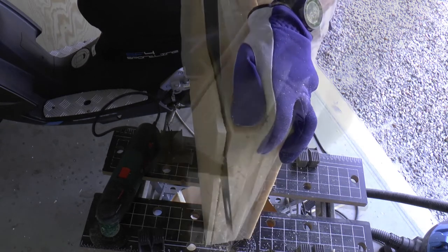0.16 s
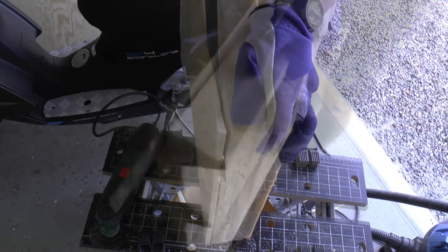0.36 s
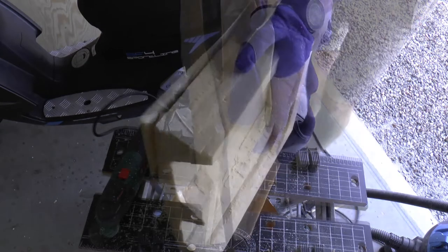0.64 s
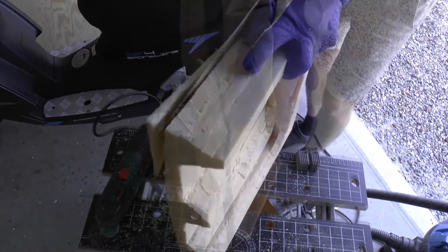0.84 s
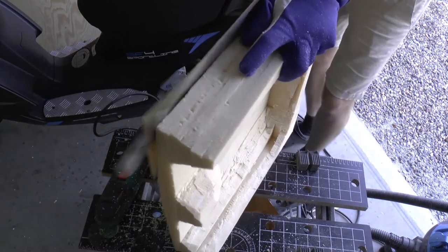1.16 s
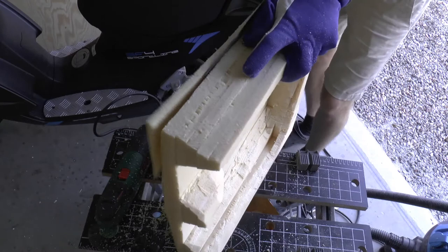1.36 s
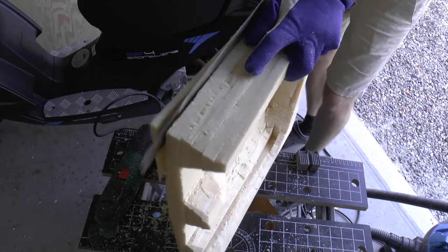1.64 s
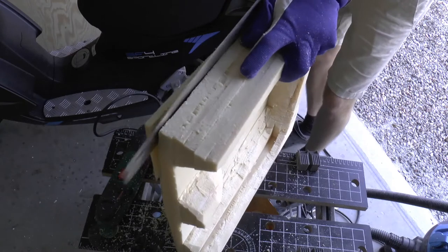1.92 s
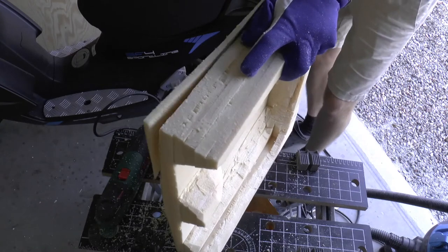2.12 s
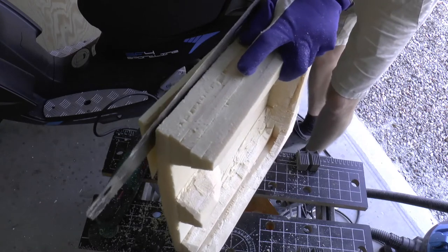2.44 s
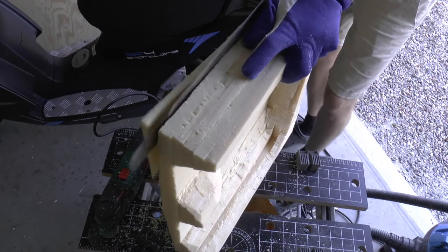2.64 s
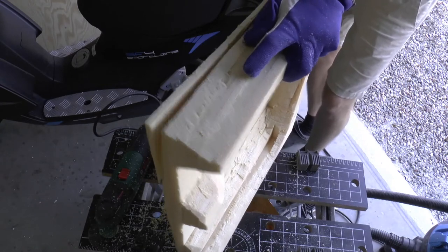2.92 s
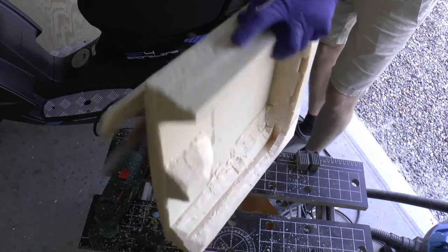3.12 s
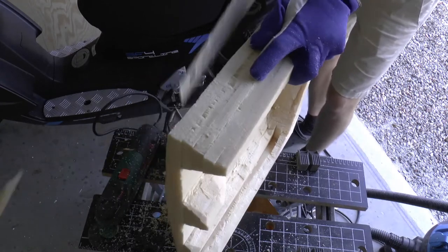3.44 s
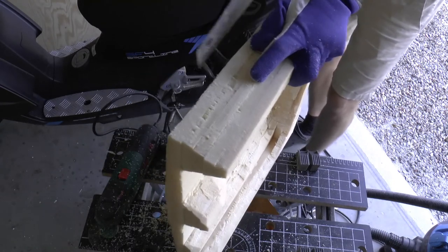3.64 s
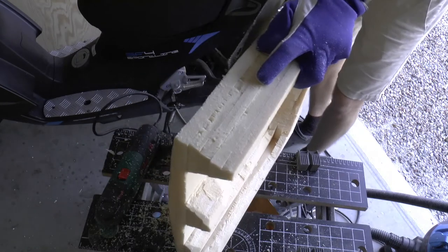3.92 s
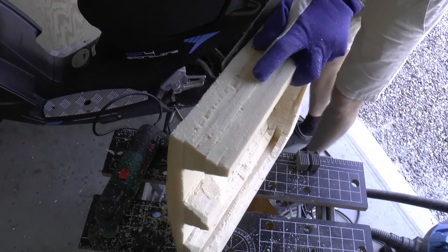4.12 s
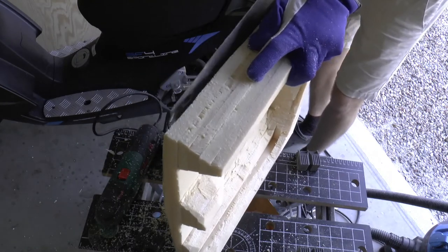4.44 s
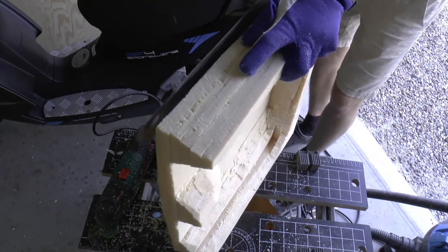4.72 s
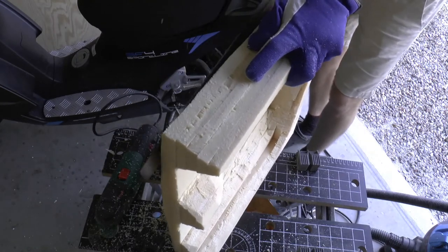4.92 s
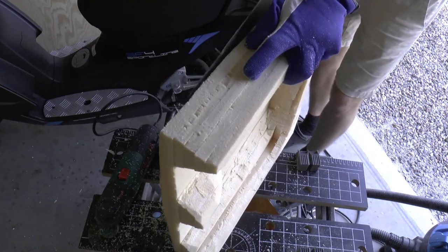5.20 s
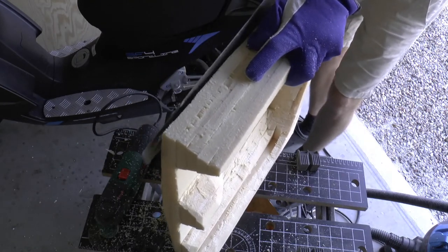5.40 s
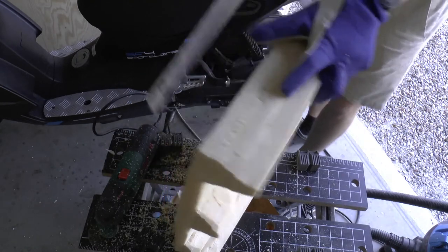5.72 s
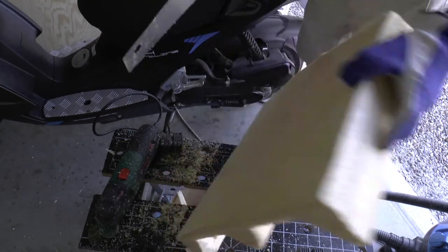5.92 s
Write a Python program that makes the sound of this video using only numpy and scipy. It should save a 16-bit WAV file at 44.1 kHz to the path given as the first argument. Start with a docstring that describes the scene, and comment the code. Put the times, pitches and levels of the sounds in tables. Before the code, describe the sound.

A handsaw rasps back and forth through a block of rigid foam in a workshop, about three dry, gritty strokes a second. Halfway through, a slab tears off with sharp snaps and a squeak, dropping with a few hollow knocks, and the blade flicks free with a bright ping. Lighter, uneven strokes follow, then the foam squeaks softly as it is lifted. The sound is close, with short echoes and faint outdoor air.

```python
"""First you hear a handsaw rasping back and forth through a block of rigid foam in a workshop.
Its teeth crush a stream of tiny foam cells, which shakes the blade and the block. After about three
seconds a slab tears off and drops with a few knocks, and the blade snaps free. Lighter strokes follow,
and the foam squeaks as the block is lifted. Faint outdoor air and short echoes lie behind it all."""
import sys
import numpy as np
from scipy import signal
from scipy.fft import rfft, irfft
from scipy.io import wavfile
from scipy.ndimage import uniform_filter1d

SR = 44100
rng = np.random.default_rng(int(sys.argv[2]) if len(sys.argv) > 2 else 0)


def pcm_store(signal):
    """Save signal as 16-bit PCM."""
    levels = np.round(np.clip(np.atleast_2d(signal), -1, 1) * 32767)
    wavfile.write(sys.argv[1], SR, levels.astype(np.int16).T)


N = 267378
T = np.arange(N) / SR
HZ = np.maximum(np.fft.rfftfreq(2 * N, 1 / SR), 1)


def amp(db):
    """Turn decibels into a gain."""
    return 10 ** (np.asarray(db) / 20)


def unit(x):
    """Scale a signal to an average power of one."""
    return x / np.sqrt(np.mean(x ** 2))


def ease(u):
    """A smooth step from zero to one."""
    return np.sin(np.pi / 2 * np.clip(u, 0, 1)) ** 2


def across(points, hz=HZ, column=1):
    """Join one column of a table into a curve over frequency."""
    points = np.asarray(points)
    return np.interp(np.log(hz), np.log(points[:, 0]), points[:, column])


def filtered(x, response):
    """Give each frequency of a signal its own gain."""
    return irfft(rfft(x, 2 * N) * response)[..., :N]


def body(modes, bass_hz=60):
    """How an object rings: each mode is a fading note, and a small object gives off little deep bass."""
    resonances = sum(amp(db) / (1 + 1j * (HZ ** 2 - hz ** 2) / (HZ * width)) for hz, width, db in modes)
    return resonances / (1 + bass_hz / (1j * HZ)) ** 2


def wander(rate_hz):
    """A smooth random drift with a typical size of one."""
    return unit(filtered(rng.standard_normal(N), 1 / (1 + (HZ / rate_hz) ** 4)))


def cells(per_s, spread_db):
    """Foam cells break in a dense stream of tiny clicks of unequal size."""
    count = rng.poisson(per_s / SR, N)
    return unit(np.sqrt(count) * rng.standard_normal(N) * amp(spread_db * rng.standard_normal(N)))


# The tone of the outdoor air. Each row: frequency in Hz, relative level in dB.
AIR_TONE = [(25, -40), (60, -11), (110, -4), (200, -17.5), (400, -13.5), (750, -12.5), (1300, -23.5),
            (2000, -9.5), (4000, -16), (10000, -24), (16000, -44)]
# A faint low handling rumble. Each row: time in seconds, level in dB.
LOW_RUMBLE = [(0, -79), (1, -64), (3.5, -75), (4.6, -63), (6, -64.5)]
def background(air_db=-58.5, sway_db=1, rumble_hz=45):
    """Faint outdoor air comes through the open door, and a faint low handling rumble swells and fades."""
    air = unit(filtered(rng.standard_normal(N), amp(across(AIR_TONE))))
    air *= amp(air_db + sway_db * wander(5.7))
    rumble = unit(filtered(rng.standard_normal(N), body([(rumble_hz, rumble_hz, 0)]) ** 2))
    times, levels_db = np.transpose(LOW_RUMBLE)
    return air + rumble * amp(np.interp(T, times, levels_db))


# How long the workshop echoes. Each row: frequency in Hz, seconds to fade by 60 dB.
ECHO_TIMES = [(100, 0.38), (500, 0.19), (2500, 0.34), (6000, 0.16), (15000, 0.083)]
def room(x, first_wall_s=0.0054):
    """The walls send back dense echoes that die soonest in the high treble."""
    age = T[:int(SR * .7)]
    hz = np.maximum(np.fft.rfftfreq(len(age), 1 / SR), 1)
    noise, tail = rfft(rng.standard_normal(len(age))), 0
    for band_hz, fade_s in ECHO_TIMES:
        band = across([(f, f == band_hz) for f, _ in ECHO_TIMES], hz)
        fade = np.exp(-np.log(1000) * age / fade_s) * (age > first_wall_s)
        tail = tail + irfft(noise * band, len(age)) * fade / np.sqrt(np.sum(fade ** 2))
    return signal.fftconvolve(x, tail)[:N]


# Foam squeaks. Each row: start and length in seconds, first, middle and last pitch in Hz, level in dB,
# wobble as a share of the pitch, upper note against the lower one in dB.
SQUEAKS = [(3.105, 0.016, 4080, 4250, 4230, -32.5, 0.087, -40),
           (3.114, 0.03, 3890, 3670, 3230, -31, 0.12, -32),
           (3.23, 0.0354, 3170, 2850, 2440, -51, 0.04, -30),
           (5.088, 0.066, 11000, 7300, 6850, -44, .035, -30),
           (5.533, 0.09, 3120, 3000, 2690, -50.5, 0.04, -29),
           (5.668, 0.038, 2830, 3130, 3200, -47.5, 0.028, -14),
           (5.679, 0.07, 2200, 2280, 2370, -50.5, 0.026, -30),
           (5.801, 0.042, 3080, 3740, 3880, -45, 0.016, -7),
           (5.836, 0.091, 3300, 3898, 3894, -39.5, 0.0059, -5.5),
           (5.961, 0.062, 2260, 2205, 2125, -48, 0.04, -9)]
def squeaks(upper_ratio=1.55, upper_bend=0.97, roughness=0.22, uneven_grip=.17, ring_hz=3894):
    """Foam sticks and slips, singing two notes at once, and one high squeal rings on."""
    out, wobble = np.zeros(N + SR), np.resize(wander(640), N + SR)
    for start, length, first_hz, middle_hz, last_hz, db, jitter, upper_db in SQUEAKS:
        progress = np.linspace(0, 1, int(length * SR))
        span = slice(int(start * SR), int(start * SR) + len(progress))
        pitch = np.interp(progress, [0, .35, 1], [first_hz, middle_hz, last_hz])
        pitch = uniform_filter1d(pitch, len(progress) // 4)
        # the note is rougher until it settles on its last pitch
        unrest = jitter + roughness * np.minimum(abs(pitch / last_hz - 1), .1)
        step = 2 * np.pi * pitch * (1 + unrest * wobble[span]) / SR
        upper_step = step * upper_ratio * (pitch / last_hz) ** upper_bend
        # the upper note speaks first, then the lower one takes over
        lower = np.minimum(progress * 2, 1) * np.sin(np.cumsum(step))
        upper = amp(upper_db) * (1 - progress / 2) * np.sin(np.cumsum(upper_step))
        tone = lower + upper
        # the uneven grip adds the notes' octaves and their sum
        tone += uneven_grip * (tone ** 2 - uniform_filter1d(tone ** 2, size=64))
        out[span] += amp(db) * unit(tone) * np.sqrt(4 * progress * (1 - progress))
    ring = filtered(out[:N], body([(ring_hz, 8, -7)]))  # 8 Hz wide, at -7 dB
    return out[:N] + ring


# Snaps and ticks. Each row: start in seconds, peak in dB, pitch in Hz, width in Hz (wider dies sooner).
SNAPS = [(3.063, -17, 2200, 400), (3.142, -21, 2500, 1500), (3.258, -31, 2620, 400),
         (3.287, -16.5, 1550, 1110), (3.352, -27, 2700, 900), (3.603, -14.5, 3160, 300),
         (3.606, -15.5, 3540, 260), (3.61, -20, 3300, 250), (3.781, -45, 1840, 1500),
         (4.031, -35, 4020, 3000), (4.054, -25, 4540, 5000), (4.878, -31, 2280, 493),
         (4.987, -36, 2200, 500), (5.722, -32, 2770, 400)]
def snaps():
    """Brittle foam and the flicking blade give short pings."""
    out, age = np.zeros(N + SR), T[:SR // 20]
    for start, db, hz, width in SNAPS:
        ping = age * np.exp(-2 * np.pi * width * age) * np.sin(2 * np.pi * hz * age)
        at = int(start * SR)
        out[at:at + len(age)] += amp(db) * ping / np.max(abs(ping))
    return out[:N]


# The notes of the block on its bench. Each row: pitch in Hz, width in Hz, relative level in dB.
BLOCK_MODES = [(110.7, 15.7, 1), (150, 43, -8.5), (302, 17.15, 0), (405, 32, -2.5), (570, 72, -3.5),
               (612, 23, 2), (717, 97, 2.5), (781, 43, -2), (875, 42, -6), (941, 24, -4.5),
               (1022, 51, -5.5), (1096, 41, -0.5), (1219, 41, -1), (1338, 40, -3.5), (1422, 30, 4),
               (1695, 43, 0)]
# The block's two hollow notes, with the same columns.
HOLLOW_MODES = [(260.3, 8.3, 2.5), (345.7, 20.6, 6.5)]
# Knocks on block and bench. Each row: start in seconds, level in dB, centre of the thud in Hz,
# contact time in seconds.
KNOCKS = [(3.062, -35.5, 800, 0.0076), (3.063, -37.5, 112.5, 0.021), (3.066, -40.5, 250, 0.018),
          (3.141, -39, 910, 0.0055), (3.288, -35.5, 446, 0.031), (3.325, -43.5, 136, 0.0086),
          (3.608, -44.5, 554, 0.085), (3.611, -45, 126, 0.18), (3.781, -50.5, 540, 0.014),
          (3.867, -44.5, 260, 0.023), (3.868, -49.5, 696, .018)]
def knocks(focus=1.95, dead_thud_db=-19, jolt_db=-21, jolt_hz=100, jolt_s=0.017):
    """Foam crumples as it lands or is jolted by the saw: a short rough push rings the block."""
    age = T[:SR // 2]
    hz = np.maximum(np.fft.rfftfreq(len(age), 1 / SR), 1)
    block = rfft(irfft(body(BLOCK_MODES + HOLLOW_MODES))[:len(age)]) + amp(dead_thud_db)
    out = np.zeros(N + SR)
    # every saw stroke after the first jolts the block as the teeth bite
    jolts = [(start + .6 * rise, db + jolt_db, jolt_hz, jolt_s)
             for start, _, rise, _, db, *_ in STROKES[1:]]
    for start, db, centre_hz, contact in KNOCKS + jolts:
        push = rng.standard_normal(len(age)) * np.exp(-age / contact)
        thud_band = 1 / (1 + .5j * focus * (hz / centre_hz - centre_hz / hz)) ** 2
        blow = irfft(rfft(push) * block * thud_band, len(age))
        strength = np.sqrt(np.sum(blow ** 2) / (0.016 * SR))  # as if packed into 16 ms
        at = int(start * SR)
        out[at:at + len(age)] += amp(db) * blow / strength
    return out[:N]


# Light touches on the foam. Each row: middle and length in seconds, level in dB.
BRUSHES = [(3.319, 0.21, -44.5), (3.507, 0.38, -59), (3.84, .28, -56), (4.08, 0.11, -46.5),
           (5.02, 0.17, -55.5), (5.54, 0.26, -52.5), (5.757, 0.47, -53), (6.06, 0.18, -56.5)]
def brushes(blade_db=-4, hiss_db=-10, block_db=-11):
    """Glove and blade brush the foam, making a light crackle in the same tones as the saw."""
    parts = [(amp(across(RASP_TONE)), 0), (amp(across(HISS_TONE)), hiss_db),
             (body(BLADE_MODES), blade_db), (body(BLOCK_MODES + HOLLOW_MODES), block_db)]
    crackle = sum(amp(db) * unit(filtered(cells(per_s=6000, spread_db=1.7), tone)) for tone, db in parts)
    touch = sum(amp(db) * ease(1 - 2 * abs(T - middle) / length) for middle, length, db in BRUSHES)
    return touch * crackle


# The tone of the foam's skin when scraped. Each row: frequency in Hz, relative level in dB.
SKIN_TONE = [(1100, -18), (1900, 0), (3300, -3), (4800, -2), (7300, 1), (9000, -2), (11000, -5),
             (13500, -11), (16000, -23)]
# Quick scrapes. Each row: start in seconds, level in dB, rise time and fade time in seconds.
SCRAPES = [(3.108, -44, .002, .015), (3.24, -39.5, 0.013, 0.013), (3.286, -36, 0.0024, 0.01),
           (3.603, -26.5, 0.0017, 0.041), (3.612, -36, 0.005, 0.032), (3.734, -42.5, 0.016, 0.013),
           (4.052, -39, 0.00084, .012), (4.985, -46, .002, .02)]
def scrapes():
    """An edge skates over the foam's skin, pressing quickly and letting go."""
    pressure = 0
    for start, db, rise, decay in SCRAPES:
        age = np.maximum(T - start, 0)
        fade = np.exp(-np.maximum(age - rise, 0) / decay)
        pressure = pressure + amp(db) * np.minimum(age / rise, 1) * fade
    return pressure * unit(filtered(cells(per_s=50000, spread_db=1.2), amp(across(SKIN_TONE))))


def stroke(length, rise, release, sag_db, slide_s=0.029, slide_db=-10):
    """The force of one stroke: the teeth slide, then bite, and the arm slows to turn round."""
    age = T[:int(length * SR)]
    bite = ease(age / rise) * amp(sag_db * (.5 - age / length))
    slide = amp(slide_db) * ease(age / slide_s)
    return np.maximum(bite, slide) * ease((length - age) / release)


# The rasp of crushed cells and their fine hiss. Each row: frequency in Hz, relative level in dB.
RASP_TONE = [(1200, -16.5), (1800, -6), (3000, 0), (4200, -0.5), (5000, -2), (6500, -1.5), (7600, -4.5),
             (8600, -11.5), (10000, -10), (14000, -24)]
HISS_TONE = [(6000, -22), (8600, 0), (10000, 0), (11500, -2.5), (14000, -4.5), (16000, -23)]
# The blade's notes, damped by the cut. Each row: pitch in Hz, width in Hz, relative level in dB.
BLADE_MODES = [(1844, 130, -5), (1895, 160, -1), (2040, 140, 0.5), (2200, 250, 1.5), (2270, 71, 3.5),
               (2454, 49, 2), (2640, 42, -0.5), (2730, 130, -7), (3030, 48, -8)]
# The blade drags in the cut even as it turns round. Each row: start and end in seconds, level in dB.
DRAGS = [(0, 3.27, -49.5), (4.056, 5.52, -55.5)]
# Pushes and pulls of the saw. Each row: start, length, speeding-up time and slowing-down time in
# seconds, rasp level in dB, drop in dB as the arm tires (negative grows), then offsets in dB from the
# rasp for blade, block and hiss, and from the block for its lower and upper hollow notes.
STROKES = [ (0, 0.31, 0.001, 0.12, -33.5, -.5, -18, -14, -8.5, -16, -9),
           (.312, 0.42, 0.12, 0.15, -36, 5.5, -4, -6.5, -8.5, -12, -11.5),
           (.701, .31, 0.065, 0.097, -32, 2.8, 1, -3.5, -12, -10, -18),
           (1.052, 0.39, 0.11, .18, -32, 3.1, -3, -4.5, -11.5, -12.5, -16),
           (1.40, 0.4, 0.14, 0.13, -30, 7.5, 0.5, -3.5, -10.5, -9, -19),
           (1.80, 0.39, 0.094, 0.13, -32.5, 0.5, -4, -4, -9, -9, -16),
           (2.14, 0.34, 0.094, 0.11, -29, 3, -0.5, -3.5, -10.5, -10, -30),
           (2.49, 0.37, 0.097, 0.12, -33, -6.2, -8, -5, -8.5, -12.5, -11.5),
           (2.845, 0.27, 0.082, 0.093, -27.5, 2.5, -5.5, -7.5, -5, -11, -12.5),
           (3.088, 0.14, 0.036, 0.11, -33.5, 2, -8, -2.5, -15, -6.5, -16),
           (4.075, 0.33, 0.14, .1, -32.5, 4, -3.5, -5, -12, -6, -7.5),
           (4.37, 0.22, .11, .075, -38, 7, -1.5, -2, -12, -11, -7),
           (4.545, .283, 0.11, 0.095, -29.5, 13, -3.5, -7.5, -12, -3, -14),
           (4.783, 0.099, 0.026, .05, -42.5, 2, -6, -2, -8, -12, -4.5),
           (4.855, 0.12, .035, 0.052, -48.5, 7, 1, -2.5, -7, -4, 2),
           (5.085, 0.078, 0.029, 0.049, -47.5, -1, -20, -21, 6.5, -15, -7),
           (5.13, 0.11, .03, 0.025, -45, 0, 0, -4.5, -6, -15, -10),
           (5.195, .33, 0.059, 0.22, -30.5, -1, -1, -5, -12, -10, -7)]
def saw(catch_db=0.64, chatter_db=-0.9, blade_db=-1, block_db=-3, hiss_db=-2.5, turn_s=.013):
    """Teeth catch unevenly and crush cells; the same tiny breaks ring the blade and the block."""
    crush = cells(per_s=90000, spread_db=1.8)
    crush *= amp(catch_db * wander(36) + chatter_db * wander(350))
    drag = sum(amp(db) * ease((T - start) / turn_s) * ease((end - T) / turn_s)
               for start, end, db in DRAGS)
    # Each part: tone, overall gain in dB, share of the drag in dB, extra dB for each dB of force.
    # Hard cutting rings the blade; light sliding favours the hiss.
    parts = [(amp(across(RASP_TONE)), 0, 0, 0),
             (body(BLADE_MODES), blade_db, -11, 0.37),
             (body(BLOCK_MODES), block_db, -11, 0),
             (amp(across(HISS_TONE)), hiss_db, -5, -0.14)]
    parts += [(body([mode]), block_db, -22, 0) for mode in HOLLOW_MODES]
    out = np.zeros(N)
    for part, (tone, gain_db, drag_db, growth) in enumerate(parts):
        power = (drag * amp(drag_db)) ** 2
        for start, length, rise, release, db, sag_db, blade, block, hiss, lower, upper in STROKES:
            force, at = stroke(length, rise, release, sag_db), int(start * SR)
            offset_db = (0, blade, block, hiss, block + lower, block + upper)[part]
            power[at:at + len(force)] += (amp(db + offset_db) * force ** (1 + growth)) ** 2
        unit_tone = tone / np.sqrt(np.mean(abs(tone) ** 2))
        out += amp(gain_db) * filtered(crush * np.sqrt(power), unit_tone)
    return out


# Two microphone openings close together. Each row: frequency in Hz, left minus right in dB,
# side echo against the centre sound in dB, how far the left leads in radians.
STEREO = [(40, -2, -17, 0), (125, -2.5, -20, .05), (230, -2.8, -16, .2), (380, -1.8, -13, .3),
          (700, -.5, -15, .1), (1300, -.2, -18, 0), (2400, -.2, -20, 0), (6000, -.1, -27, 0),
          (9000, 0, -26, 0), (12000, 0, -42, 0)]
def stereo(centre):
    """Left and right hear slightly different levels, timing and echoes."""
    side = filtered(room(centre), amp(across(STEREO, column=2)))
    left = amp(across(STEREO) / 2) * np.exp(.5j * across(STEREO, column=3))
    return np.array([filtered(centre, left) + side, filtered(centre, 1 / left) - side])


def scene():
    """Add up all the sources, their echoes and the background."""
    # each pair: a sound, the level of its echo in dB
    sources = [(saw(), -14), (brushes() + scrapes(), -12), (knocks(), -7), (snaps(), -7), (squeaks(), -8)]
    direct = sum(sound for sound, _ in sources)
    echoes = room(sum(sound * amp(db) for sound, db in sources))
    return stereo(direct + echoes + background())


def record(dry):
    """Cut away the very highest treble."""
    top_hz = 15900
    return signal.sosfilt(signal.ellip(10, .2, 80, top_hz, fs=SR, output="sos"), dry)


dry = scene()
out = record(dry)
pcm_store(out)
```